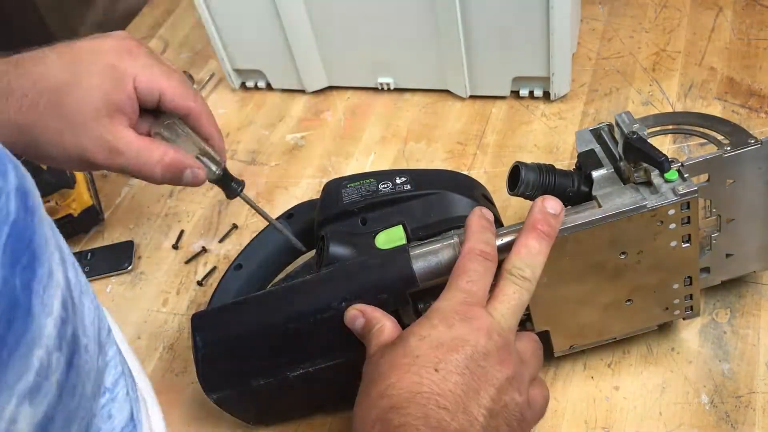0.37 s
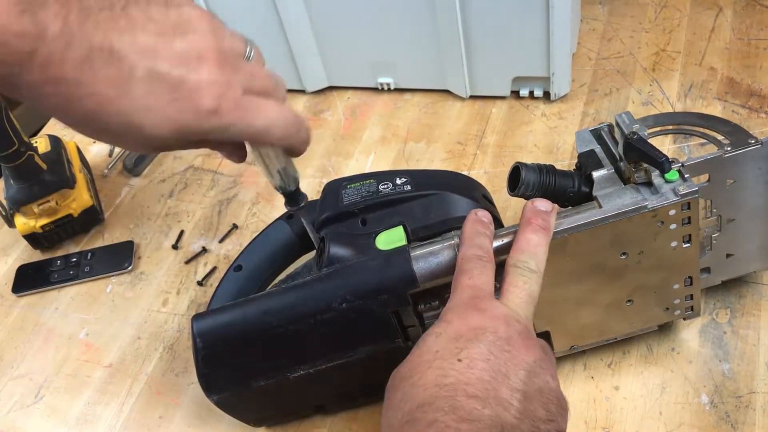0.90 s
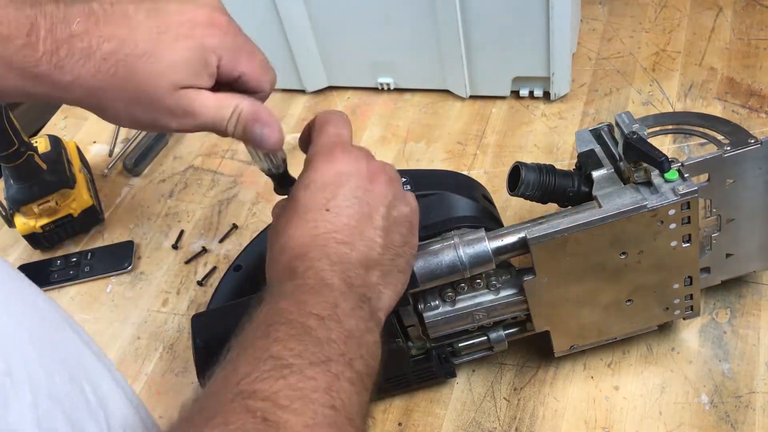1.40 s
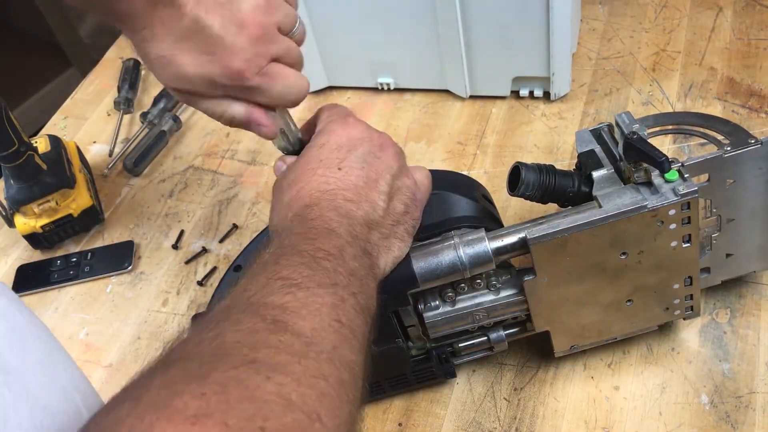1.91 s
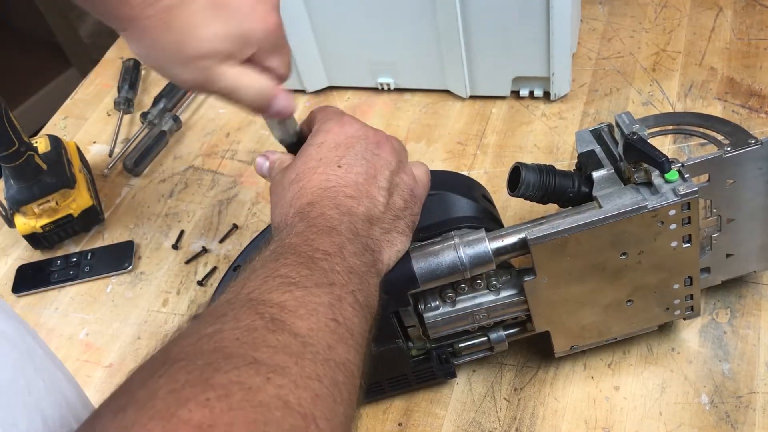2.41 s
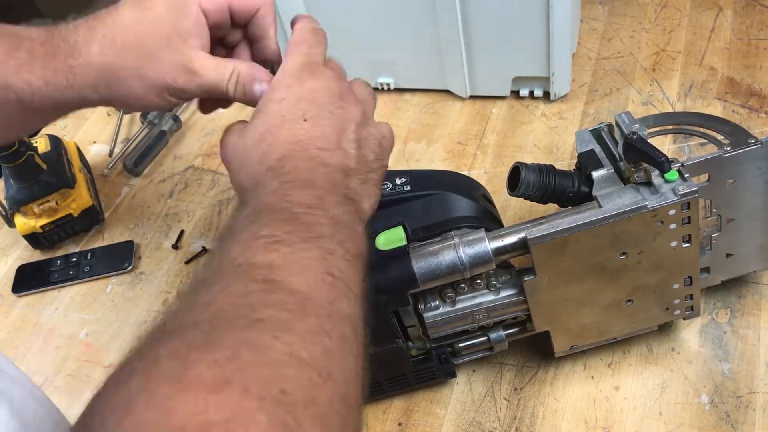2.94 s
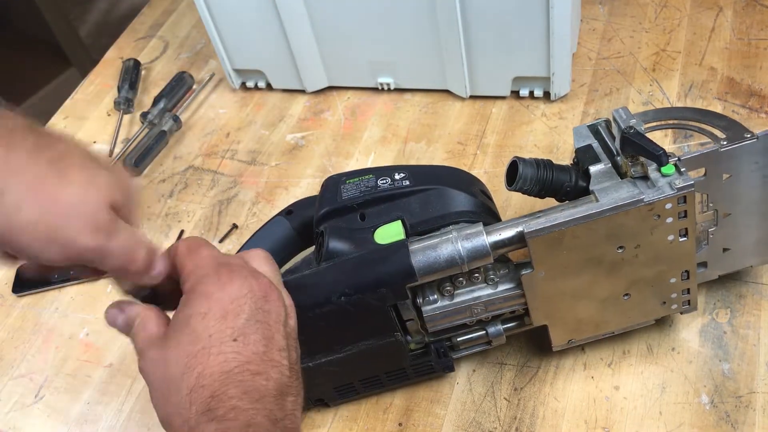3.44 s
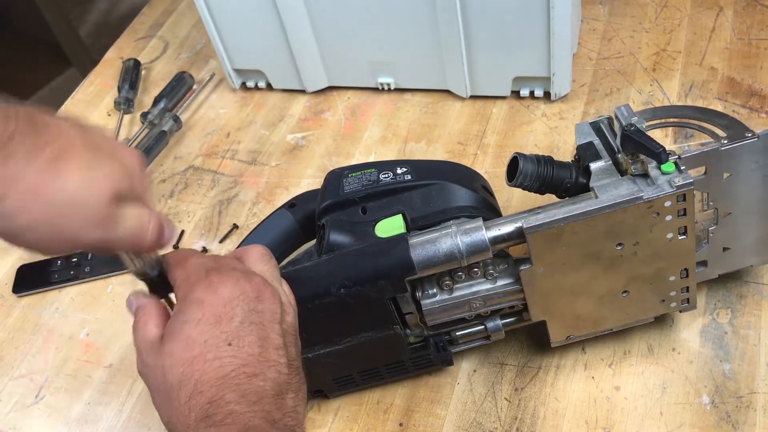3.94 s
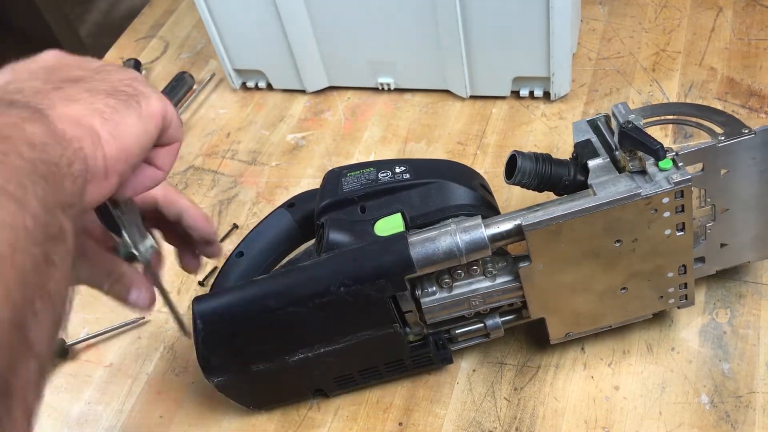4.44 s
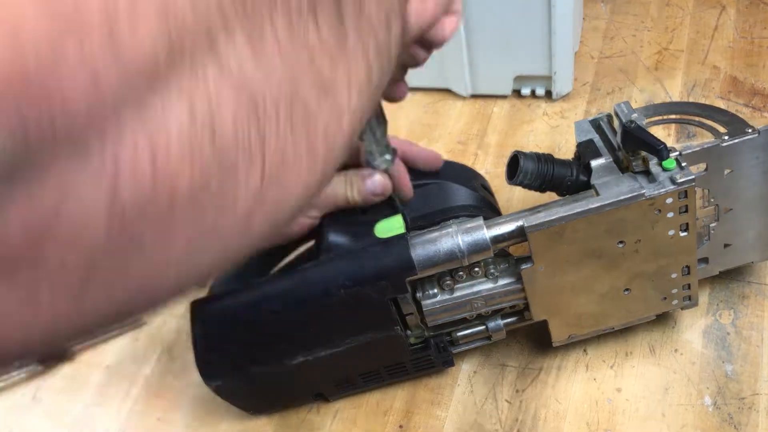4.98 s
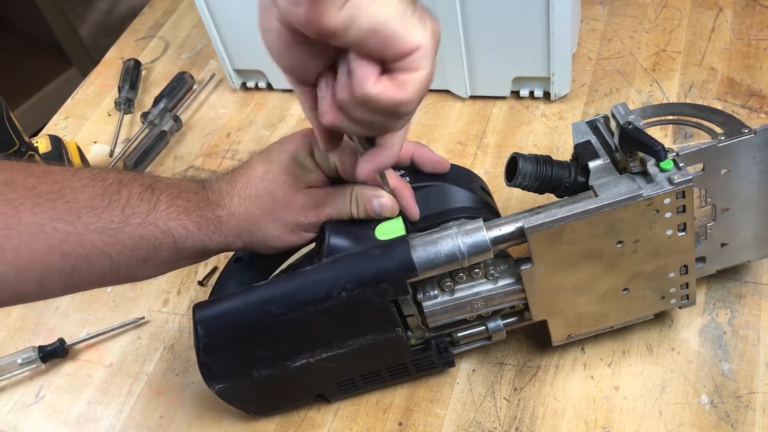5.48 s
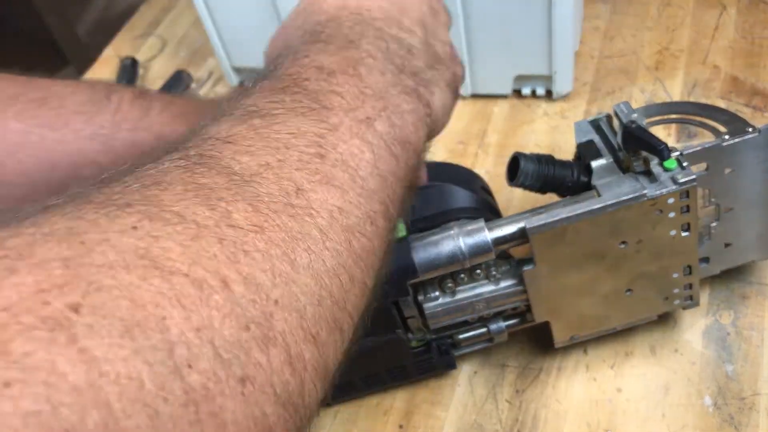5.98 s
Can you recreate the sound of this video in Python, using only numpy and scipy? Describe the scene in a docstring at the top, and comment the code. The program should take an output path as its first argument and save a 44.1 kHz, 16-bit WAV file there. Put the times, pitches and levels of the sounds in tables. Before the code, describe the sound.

Hand tool work on a wooden bench in a quiet indoor workshop, heard from very near. Crisp, dry, uneven steel ticks with tiny hollow plastic knocks crowd the first second, thin out while a screw is turned, then return as louder snaps and rattly handling. Soft finger rubs and fine gritty scrapes fill the gaps. Behind them are faint steady machine tones and, near the start, a brief low drone.

```python
"""A steel screwdriver works small screws out of a hollow plastic tool housing on a wooden bench, close by.
Each contact is an impulsive crack that excites the modes of shaft and housing, with a short noise tail.
Between the ticks, filtered noise with uneven slips and grit forms the rubbing and soft handling sounds.
Behind lies a quiet workshop of coloured noise and sine tones, with a low drone passing near the start."""
import sys
import numpy as np
from scipy import signal
from scipy.fft import rfft, irfft, next_fast_len
from scipy.io import wavfile
from scipy.ndimage import uniform_filter1d, minimum_filter1d, map_coordinates

SR = 44100
rng = np.random.default_rng(int(sys.argv[2]) if len(sys.argv) > 2 else 0)


def unload_audio(sound):
    """Save the sound as a 16-bit wav file, at the path given as the first command line argument."""
    columns = np.transpose(np.atleast_2d(sound))
    # keep every value between -1 and 1, then stretch to whole-number steps
    steps = np.round(np.clip(columns, -1, 1) * 32767)
    wavfile.write(sys.argv[1], SR, steps.astype(np.int16))


def to_linear_factor(level_db):
    """Convert decibel levels (scalar or array-like) to linear amplitude factors."""
    exponent = np.asarray(level_db, float) / 20
    return 10 ** exponent


N = 269274

# Tip on steel: (time [s], relative shaft ring level [dB], grip: housing body over shaft [dB],
# lean: lower over upper shaft ring [dB], sharpness: edge over shaft [dB])
STEEL_TICKS = [(0.0412, -40, 0, -3, -5), (0.048, -38, -4, 0, -7), (0.055, -36.5, -29, -21, -21),
               (0.0621, -23.5, -17, -15, -27), (0.0698, -29, -25, 2, 6), (0.0844, -49, -12, 5, -10),
               (0.1006, -31, -13, -18, -2), (0.1056, -34, -31, -16, -13), (0.1177, -31, -6, 0, 6),
               (0.124, -39, 4, 14, 13), (0.1561, -32, 11.5, 4, -9), (0.2856, -40.5, -7, 16, 8),
               (0.2915, -36, -16, 9, 8), (0.298, -42, -15, 18, -18), (0.3077, -36.5, -8, 16, 3),
               (0.318, -44, -8, 13, -10), (0.3271, -38.5, -28, 19, 10), (0.47, -38.5, -13, 9, 3),
               (0.477, -38, -15, 23, 2), (0.4855, -36, -3, 11, 15), (0.493, -27, -18, -20, -7),
               (0.5082, -35, -22, -5, 0), (0.547, -33, -5, 0, 7), (0.5538, -23, -9, -9, -12),
               (0.6286, -32.5, -11, 2, 1), (0.646, -48, -12, 3, -20), (0.6542, -34, -30, -9, 4),
               (0.74, -38, -24, 0, 3), (0.7896, -37.5, -25, -14, 2), (0.84, -45, -4, 5, -11),
               (0.847, -39.5, -28, -11, -36), (0.8814, -44, -19, 0, -12), (0.8867, -35.5, 3.5, 2, -8),
               (0.899, -38, -26, -8, 6), (0.9157, -40, -23, -3, 6), (0.9218, -42, -26, -19, -22),
               (0.929, -31, -21, -1, 0), (0.9716, -33.5, -21, 1, 7), (0.978, -32.5, -31, 1, -9),
               (0.984, -30.5, -15, -15, -32), (1.005, -33, -18, -8, -27), (1.042, -27.5, -1.5, -12, 2),
               (1.049, -39, -22, -4, -13), (1.052, -42, -3, 3, -8), (1.059, -31.5, 5.5, -8, -24),
               (1.064, -44, -15, -2, 4), (1.106, -43, -3, 0, -1), (1.1108, -46, -18, -9, -16),
               (1.1152, -39, -8, -20, -41), (1.198, -51.5, -26, -18, -20), (1.474, -39.5, -8, 4, -8),
               (1.4855, -39, -20, 9, -26), (1.4986, -39, -5, 12, 4), (1.55, -37.5, -6, -4, -2),
               (1.5718, -38, -5, 7, -15), (1.583, -30, -6, 11, -30), (1.6017, -33, -12, 15, -6),
               (1.624, -43, -21, 16, -2), (1.634, -43.5, -7, 4, 16), (1.6958, -44, -22, 13, 9),
               (1.7075, -40, -21, 4, -9), (1.7163, -19, -7, -3, -1.5), (1.7715, -34.5, 0.5, -5, -23),
               (1.8667, -42, -12, -8, -3), (1.8778, -22, 3, -3, 6), (1.961, -42, -19, -13, 3),
               (2.007, -40, 3.5, 10, -4), (2.126, -46, -15, -5, -7), (2.137, -36, -18, -11, -5),
               (2.144, -38, -30, 8, -8), (2.194, -33, -7, -3, -7), (2.247, -38.5, -4, 11, -14),
               (2.298, -34.5, -12, -5, -6), (2.3873, -40.5, -8, 1, -11), (2.3957, -34, -12, -12, -6),
               (2.446, -38, -13, -2, -5), (2.597, -43.5, -17, 12, -12), (2.8462, -38, -1, 1, -16),
               (2.929, -36.5, -10, -13, -32), (2.9413, -36, 3, 10, -4), (2.9497, -32, 4.5, 9, 1),
               (2.965, -40, -28, -12, -26), (2.99, -35, 6.5, 12, 2), (3.005, -36.5, -22, -2, -30),
               (3.043, -25, -17, -13, -42), (3.0538, -35, 7, 18, -4), (3.0848, -32.5, -11, 6, -11),
               (3.1393, -36, 5, -17, -1), (3.161, -37, 2, -5, -12), (3.178, -15.5, 1, 0, -3),
               (3.1914, -19, -2, -15, -11), (3.236, -48, -13, -20, -16), (3.2458, -46.5, 4, -12, 1),
               (3.366, -44, 2, -4, -10), (3.3799, -16.5, -2.5, -0.5, -12), (3.478, -54, 14, -4, -7),
               (3.4835, -41.5, 0, -11, -15), (3.7799, -30, 5.5, 2, -8), (3.785, -35.5, 4, 2, -7),
               (3.8354, -18.5, -2.5, 2.5, 3), (3.896, -30.5, 13.5, 7, -4), (3.9028, -22, -1, -9, 4.5),
               (3.9342, -42, 6, -5, -18), (3.959, -52, 1, -15, 12), (4.045, -38.5, 8.5, -4, -8),
               (4.0716, -17.5, -2, 3, -12), (4.0776, -27, 4.5, -22, 7.5), (4.1036, -40, 4, 5, -18),
               (4.191, -40, 3, -9, 1), (4.2237, -45.5, -12, -20, 15.5), (4.238, -58, 18, -2, 27),
               (4.25, -54, 1, -6, 17), (4.279, -47, 7, 2, 17), (4.3042, -50, 4, -3, 17),
               (4.3105, -23.5, 5, -13, 0.5), (4.336, -28.5, 7.5, -2, 0), (4.374, -26.5, 5, -16, -6),
               (4.3865, -26.5, 3, 3, -25), (4.441, -42.5, 8, -10, 14), (4.4564, -40, 7, -7, 6),
               (4.4669, -45, 12, -11, 17), (4.473, -50, 5, -8, 18), (4.4806, -40, 14.5, -2, 8),
               (4.4995, -43.5, 13, -4, 10), (4.585, -46, 5, 2, 16), (4.5936, -41, 3, -1, 16),
               (4.602, -22.5, -2.5, 4, 1), (4.695, -43.5, -3, -2, 10), (4.7106, -28, 1, -22, 2),
               (4.72, -42, -4, -6, 13), (4.729, -39, -20, 2, 4), (4.7376, -33.5, 4, -14, 9.5),
               (4.7574, -27.5, -6.5, -2, -5), (4.784, -35, 3, -6, -2), (4.794, -34.5, 4.5, 5, -5),
               (4.822, -48.5, 10, -9, 14), (4.8376, -47, -9, -16, 6), (4.8476, -41.5, 7.5, -3, 7),
               (4.868, -56, -13, -16, 14), (4.883, -47.5, -6, -27, 8), (4.973, -32.5, -2, -10, 12.5),
               (4.9865, -52, -13, -3, 17), (4.997, -23.5, -16, 5, -3), (5.014, -31.5, -13, 3, -10),
               (5.059, -39, -27, -12, -8), (5.175, -41.5, -17, -6, -16), (5.1901, -42.5, 4, 2, -4),
               (5.198, -56, -9, 6, 14), (5.208, -34, -8, -1, -18), (5.2367, -33, -10, -3, -17),
               (5.274, -37, -11, 2, -4), (5.354, -38, 0.5, -4, -7), (5.428, -44, -18, 10, 0),
               (5.4586, -45, -18, -11, -9), (5.509, -47, -22, 16, 0), (5.5512, -42.5, -2, 4, -2),
               (5.575, -37.5, -4, 4, -12), (5.6384, -39, -20, -17, 7), (5.6584, -28.5, -44, 8, 5.5),
               (5.741, -53.5, -13, -10, 13), (6.0025, -41, 3, -3, 13), (6.0108, -36, -7, 0, 10),
               (6.0254, -29, -24, 6, -15), (6.0699, -23.5, -13.5, 2, -6), (6.0855, -34, -8, 1, 2),
               (6.1041, -31, -11, -3, -12)]
# Light touches of the tip, colour left to chance: (time [s], relative shaft ring level [dB])
LIGHT_TOUCHES = [(0.0647, -35.5), (0.099, -44), (.4795, -39), (.533, -45), (.614, -50), (.691, -47),
                 (0.699, -50), (.707, -45), (.808, -47), (0.858, -58), (.871, -52), (1.281, -46),
                 (1.856, -63), (1.927, -46), (1.947, -46), (1.9924, -44), (2.181, -58), (2.2248, -54),
                 (2.33, -51), (2.3495, -46), (2.379, -56), (2.44, -46), (2.488, -43), (2.554, -47.5),
                 (2.7013, -43.5), (2.817, -47.5), (3.3761, -34), (4.735, -32), (4.852, -41), (5.074, -53),
                 (5.16, -51), (5.231, -46), (5.249, -45), (5.268, -42), (5.3176, -47.5), (5.334, -42.5),
                 (5.378, -51), (5.398, -51), (5.417, -55), (5.479, -50), (5.5426, -46), (5.567, -47),
                 (5.612, -53), (5.619, -51), (5.709, -50.5), (5.8225, -48)]
# Dull blows that reach the hollow housing: (time [s], relative level [dB])
HOUSING_KNOCKS = [(0.0151, -54), (0.0535, -46.5), (0.1551, -37.5), (0.5583, -54), (0.6458, -47),
                  (0.7447, -52.5), (0.8599, -52.5), (0.8734, -51.5), (0.8896, -50.5), (0.9235, -52.5),
                  (0.9789, -50.5), (1.0029, -53), (1.0432, -39), (1.0687, -43.5), (1.1151, -58.5),
                  (1.198, -60), (1.5836, -52), (1.5998, -50.5), (1.8798, -47.5), (1.9616, -49),
                  (2.1439, -50.5), (2.1954, -51), (2.9545, -52.5), (3.0448, -51.5), (3.2374, -57),
                  (3.3798, -36), (3.7864, -47), (3.8988, -38.5), (3.9833, -47), (4.0795, -48.5),
                  (4.388, -56), (4.4658, -55), (4.4862, -53), (4.5004, -60), (4.6032, -53), (4.7096, -50.5),
                  (4.7388, -48.5), (4.76, -58), (4.792, -48), (4.8527, -48), (4.884, -68), (4.9954, -51.5),
                  (5.0125, -61), (5.2101, -52), (5.2756, -54.5), (5.5764, -55), (5.6595, -50.5),
                  (6.0229, -48), (6.0693, -48.5)]
# Blows that shift the tool on the bench: (time [s], relative level [dB])
BENCH_JOLTS = [(0.1577, -40), (1.879, -44), (3.382, -44), (3.9, -45), (4.072, -49), (1.717, -53)]
# Modes that a contact rings: (frequency [Hz], width [Hz], relative level [dB])
CONTACT_MODES = [(585, 150, 11.5), (761.6, 29, 31.5), (930, 63.5, 27), (1100, 16, 11.5), (1231, 51, 19.5),
                 (1790, 330, 7), (2325, 370, 7.5), (2774, 324, 4), (3557, 370, 4.5), (4370, 185, 0.5),
                 (5510, 354, 6.5), (6386, 350, -0.5), (7640, 590, 3), (8846, 216, -1.5), (10690, 480, -5),
                 (11790, 670, -4.5), (13000, 340, -4), (14230, 580, -3.5)]
# Short noise tail of a contact: (frequency [Hz], 60 dB decay time [s])
TAIL_DECAY = [(500, 0.062), (1300, 0.078), (3500, 0.034), (9000, 0.033), (16000, 0.041)]
# Rubbing: (time [s], relative fine scrape level [dB], treble above about 9.5 kHz over it [dB])
RUB_LEVELS = [(0.0, -58, -2), (0.27, -77, 0), (0.39, -68, -12), (0.53, -63.5, -2), (0.66, -59.5, -4),
              (0.94, -63.5, -4), (1.26, -61.5, -2.5), (1.53, -66.5, -4), (1.7, -61, 1), (1.99, -64, -2.5),
              (2.48, -63, -3), (2.67, -64.5, -9), (2.91, -64.5, -9), (3.08, -62.5, -2), (3.49, -64, -8),
              (3.67, -62, -6), (4.34, -63, -2), (4.61, -66, 0), (5.44, -61, -5), (5.53, -66.5, -2),
              (5.75, -65.5, -2), (6.11, -70, 9)]
# Soft swishes and faint rattling of handling: (middle time [s], length [s], level [dB])
HANDLING_SWISHES = [(0.05, 0.46, -53), (1.055, 0.21, -68), (1.57, 0.24, -59), (2.628, 0.15, -58),
                    (3.35, 0.11, -56), (3.49, 0.16, -59.5), (3.614, 0.31, -62), (4.27, 0.074, -60),
                    (4.466, 0.13, -62), (4.778, 0.52, -62), (4.975, 0.23, -60), (5.955, 0.67, -63)]
# Colour of the tip's scrape: (frequency [Hz], relative level [dB])
SCRAPE_SPECTRUM = [(2500, -28), (4500, 1), (5500, -1.5), (8000, -1.5), (10000, -1.5), (15800, 2.5),
                   (16100, -55)]
# Colour of the fingers' rub and the handling: (frequency [Hz], relative level [dB])
HANDLING_SPECTRUM = [(1500, -27), (2600, -6.5), (3200, 0.5), (3700, -2), (5000, -12.5)]
# Colour of the room air: (frequency [Hz], relative level [dB])
AIR_SPECTRUM = [(20, -22), (200, -22.5), (300, -13.5), (450, -4.5), (600, -9), (800, 5), (1000, -1.5),
                (1500, -1.5), (2100, -2.5), (3000, -11.5), (5000, -24), (9000, -26.5), (15800, -35),
                (16100, -82)]
# Colour of the low noise around the drone: (frequency [Hz], relative level [dB])
RUMBLE_SPECTRUM = [(60, -26), (250, -12), (400, 5), (520, -37)]
# Nearly steady machine lines: (mean frequency [Hz], mean level [dB])
MACHINE_LINES = [(484, -77), (968, -72), (1936, -73.5), (568, -66.5), (594, -72.5)]
# Path of the drone's lower tone: (time [s], mean frequency [Hz], mean level [dB])
DRONE_PATH = [(.29, 480, -82), (.33, 443, -70), (.38, 409, -88), (.5, 300, -90), (.58, 314, -75),
              (.66, 320, -72), (.8, 328, -72), (.98, 332, -71), (1.04, 346, -72), (1.1, 356, -88)]

REGISTER_HZ = [1000, 3600, 5500, 7600, 13500]  # hollow, body, lower shaft, upper shaft, edge
SPAN = 6144  # samples given to one contact
DETUNE, VARY_DB = .3, 2.2  # mode shift as a share of its width; scatter of its strength
TAIL_DB = -7  # noise tail relative to the direct tick
TICK_HOLLOW_DB, TICK_GRIP_SHARE = -32.5, 0.024  # a tick's hollow knock over its shaft ring; share of grip added
KNOCK_BODY_DB, KNOCK_TOP_DB = 7.5, -51  # a knock's body and treble relative to its level
FAINT_PER_S = 30  # chance ticks, on average over the whole scene
# Chance ticks: shaft ring over the scrape table, scatter, body and edge over the shaft
FAINT_DB, FAINT_SPREAD_DB, FAINT_TINT_DB = 7, 4.5, -3.5
BUSY_S = .05  # window, applied twice, that spreads each tick into a time of hard dragging
BUSY_DB, GRIT_REST = 1.5, 0.71  # scrape gain over the pauses; amplitude of grit left in them
SLIPS_PER_S, SLIP_DB = 70, 3.5  # rate and depth of the scrape's unevenness
GRIT_PER_S, GRIT_DB = 350, 1  # mean click rate; grit level before the busy weighting
FINGERS_REST_DB = -5.5  # resting fingers, relative to the scrape table
CEILING, HOLD = .46, 130  # limiter threshold (amplitude); its smoothing window (samples, about 3 ms)
TOP_HZ, EDGE_HZ = 16400, 700  # middle and width of the band limit


def unit(x):
    """Normalization: x at rms 1."""
    return x / np.sqrt(np.mean(x ** 2) + 1e-20)


def along(points, hz):
    """Interpolation on a logarithmic frequency axis through (frequency [Hz], value) points."""
    f, v = np.transpose(points)
    return np.interp(np.log(hz + 1), np.log(f + 1), v)


def curves(rows, **ends):
    """Linear interpolation in time: one value per sample for each column after the time."""
    s, *columns = np.transpose(rows)
    return [np.interp(np.arange(N) / SR, s, c, **ends) for c in columns]


def wobble(rate):
    """Band-limited random modulation: a smooth curve through `rate` random knots a second."""
    knots = rng.standard_normal(int(N * rate / SR) + 4)
    return map_coordinates(knots, [np.arange(N) * rate / SR])


def coloured(x, spectrum):
    """Linear filtering: x shaped by a spectrum table, then set to rms 1."""
    m = next_fast_len(N + 8192)
    gain = to_linear_factor(along(spectrum, np.fft.rfftfreq(m, 1 / SR)))
    return unit(irfft(rfft(x, m) * gain, m)[:N])


def bell(middle_s, length_s):
    """Gaussian envelope: a rise and fall centred on middle_s, with e^-2 points length_s apart."""
    return np.exp(-8 * ((np.arange(N) / SR - middle_s) / length_s) ** 2)


def tone(hz, db):
    """Frequency modulation: a sine whose phase is the running sum of hz, with rms level db."""
    return np.sqrt(2) * to_linear_factor(db) * np.sin(2 * np.pi * np.cumsum(hz) / SR)


def workshop():
    """Superposition of broadband room air, narrow machine lines and a gliding two-partial drone."""
    drift_db = .8 * wobble(3) + 1.2 * wobble(13)
    air = to_linear_factor(-61 + drift_db) * coloured(rng.standard_normal(N), AIR_SPECTRUM)
    hum = sum(tone(hz * (1 + .0012 * wobble(6)), db + .9 * wobble(12)) for hz, db in MACHINE_LINES)
    drone_hz = curves(DRONE_PATH)[0]
    drone_db = curves(DRONE_PATH, left=-120, right=-120)[1]
    drone_hz = drone_hz + 3 * wobble(25)
    drone_db = drone_db + 2.2 * wobble(30)
    swell = to_linear_factor(-70) * bell(middle_s=0.84, length_s=1.08)
    rumble = swell * coloured(rng.standard_normal(N), RUMBLE_SPECTRUM)
    drone = tone(drone_hz, drone_db) + tone(2 * drone_hz, drone_db - 6)
    return air + rumble + hum + drone


def modes(hz, shift=0):
    """Resonance of a damped oscillator, one row a mode; shift moves it by a share of its width."""
    centre, width = np.transpose(CONTACT_MODES)[:2, :, None]
    return 1j * hz * width / ((centre + shift * width) ** 2 - hz ** 2 + 1j * hz * width)


def busy():
    """Saturating event density: 0 in pauses, towards 1 where ticks crowd and the tip drags hard."""
    tick_samples = np.round(np.transpose(STEEL_TICKS)[0] * SR).astype(int)
    marks = 1. * np.bincount(tick_samples, minlength=N)
    reach = round(BUSY_S * SR)
    return np.tanh(reach * uniform_filter1d(uniform_filter1d(marks, size=reach), size=reach))


def swishes():
    """Amplitude modulation: each soft swish or faint rattle of handling swells and fades as a bell curve."""
    return sum(to_linear_factor(db) * bell(s, length) for s, length, db in HANDLING_SWISHES)


def slips(rate, depth_db):
    """Uneven friction: white noise whose level wanders at random."""
    return to_linear_factor(depth_db * wobble(rate)) * rng.standard_normal(N)


def grit_clicks():
    """Random impulsive excitation of resonances: tiny noisy clicks ring the contact modes."""
    chance, size = rng.random((2, N))
    clicks = (chance < GRIT_PER_S / SR) * size ** -.3
    bursts = signal.lfilter([1], [1, -.95], clicks) * rng.standard_normal(N)
    hz = np.fft.rfftfreq(N, 1 / SR)
    power = to_linear_factor(2 * np.transpose(CONTACT_MODES)[2]) @ abs(modes(hz)) ** 2
    return irfft(rfft(bursts) * np.sqrt(power), N)


def rubbing():
    """Friction noise: tip and fingers drag as hiss broken into uneven slips, with ringing grit."""
    scrape_db, bright_db = curves(RUB_LEVELS)
    grit = grit_clicks()
    scrape = coloured(slips(SLIPS_PER_S, SLIP_DB), SCRAPE_SPECTRUM)
    scrape = scrape + to_linear_factor(GRIT_DB) * (GRIT_REST + busy()) * coloured(grit, SCRAPE_SPECTRUM)
    hz = np.fft.rfftfreq(N, 1 / SR)
    treble = irfft(rfft(scrape) * np.clip(hz / 3000 - 2.7, 0, 1), N)  # crossover from 8.1 to 11.1 kHz
    drag = to_linear_factor(scrape_db + BUSY_DB * (busy() - 2.0))
    scrape = drag * (scrape - treble + to_linear_factor(bright_db) * treble)
    handling_gain = to_linear_factor(scrape_db + FINGERS_REST_DB) + swishes()
    return scrape + handling_gain * coloured(slips(60, depth_db=3.5), HANDLING_SPECTRUM)


def noise_tails(count):
    """Exponential decay: a short decaying noise tail, drawn at random for each contact."""
    hz, t, z = signal.stft(rng.standard_normal((count, SPAN // 2)), SR, nperseg=128)
    decay = to_linear_factor(-60 * t / along(TAIL_DECAY, hz)[:, None])
    tail = signal.istft(z * decay, SR, nperseg=128)[1]
    tail = np.pad(tail, [(0, 0), (50, 0)])  # 50 samples behind the direct sound
    return rfft(tail / np.linalg.norm(tail, axis=1)[:, None], SPAN)


def contacts():
    """Impact excitation: times, strengths in the five registers and bench jolts of all contacts."""
    s, shaft, grip, lean, sharp = np.transpose(STEEL_TICKS)
    light_s, light_db = np.transpose(LIGHT_TOUCHES)
    chance = rng.standard_normal(round(FAINT_PER_S * N / SR))
    draw = rng.standard_normal((len(chance) + len(LIGHT_TOUCHES), 4))

    # faint chance ticks gather near the listed ticks
    faint_s = rng.choice(s, len(chance)) + BUSY_S * rng.normal(0, .5, len(chance))
    faint_s = np.clip(faint_s, .002, (N - 1) / SR)
    scrape_db = np.interp(faint_s, *np.transpose(RUB_LEVELS)[:2])
    faint_db = scrape_db + FAINT_DB + FAINT_SPREAD_DB * chance
    s = np.r_[s, faint_s, light_s]
    shaft = np.r_[shaft, faint_db, light_db]
    grip = np.r_[grip, FAINT_TINT_DB + FAINT_SPREAD_DB * draw[:, 1]]
    sharp = np.r_[sharp, FAINT_TINT_DB + FAINT_SPREAD_DB * draw[:, 2]]
    lean = np.r_[lean, FAINT_SPREAD_DB * draw[:, 3]]

    knock_s, blow = np.transpose(HOUSING_KNOCKS)
    knock_top = blow + KNOCK_TOP_DB
    hollow = np.r_[shaft + TICK_HOLLOW_DB + TICK_GRIP_SHARE * grip, blow]
    body = np.r_[shaft + grip, blow + KNOCK_BODY_DB]
    lower = np.r_[shaft + lean / 2, knock_top]
    upper = np.r_[shaft - lean / 2, knock_top]
    edge = np.r_[shaft + sharp, knock_top]

    # a jolt has only its thump, every other contact has none
    shift_s, jolt_db = np.transpose(BENCH_JOLTS)
    no_ring = np.full(len(shift_s), -200)
    registers = [np.r_[r, no_ring] for r in (hollow, body, lower, upper, edge)]
    return np.r_[s, knock_s, shift_s], registers, np.r_[np.full(len(hollow), -200), jolt_db]


def strengths_at(hz, register_db):
    """Spectral interpolation: the level of each contact, one row a contact, between its registers."""
    knots = np.log(REGISTER_HZ)
    return np.array([np.interp(np.log(hz + 1), knots, row) for row in zip(*register_db)])


def ticks():
    """Modal synthesis: a crack of a few milliseconds with ringing modes, at new strengths each time."""
    s, register_db, jolt_db = contacts()
    t, hz = np.arange(400) / SR, np.fft.rfftfreq(SPAN, 1 / SR)
    centre, _, mode_db = np.transpose(CONTACT_MODES)
    count = len(centre)
    draw = rng.standard_normal((len(s), 512))

    envelope = (t / .00025) ** 2 * np.exp(-t / 0.00041)  # builds, then lets go
    chatter = rfft(draw[:, :len(t)] * envelope, SPAN)
    chatter /= np.sqrt(uniform_filter1d(abs(chatter) ** 2, size=150, axis=1) + 1e-9)  # even over frequency
    # radiated straight from the contact
    crack = to_linear_factor(strengths_at(hz, register_db) - 4) * chatter * hz / (hz + 1500)

    strength = to_linear_factor(mode_db + strengths_at(centre, register_db) + VARY_DB * draw[:, -count:])
    strength = strength * (-1) ** np.arange(count)  # alternate signs keep the valleys filled
    # slow bending waves: the housing's low modes answer a few ms after the crack
    lag = 0.000212 + 2.254 / centre[:, None]
    late = np.exp(-2j * np.pi * hz * lag)
    side = np.sign(draw[:, len(t) + count:len(t) + 2 * count])  # each mode is shifted up or down at random
    rings = sum((strength * (side == way)) @ (modes(hz, way * DETUNE) * late) for way in (-1, 1))

    small_body = hz ** 2 / (hz ** 2 + 450 ** 2)  # a small body radiates little bass
    thump = to_linear_factor(jolt_db)[:, None] / (1 + 1j * hz / 160)  # a hard blow also jolts the bench
    direct = small_body * (rings + crack) + thump
    rung = to_linear_factor(20.0) * irfft(direct * (1 + to_linear_factor(TAIL_DB) * noise_tails(count=len(s))), SPAN)

    # the last 64 samples of the circular response belong ahead of the contact
    offset = (np.arange(SPAN) + 64) % SPAN - 64
    where = np.round(s * SR).astype(int)[:, None] + offset
    return np.bincount(where.ravel(), rung.ravel(), N + SPAN)[:N]


def scene():
    """Superposition: contacts and rubbing up close, the workshop behind."""
    return (ticks() + rubbing() + workshop())[None]


def limited(x):
    """Dynamic range limiting: the gain dips smoothly around the highest peaks."""
    gain = minimum_filter1d(np.minimum(1, CEILING / (abs(x) + 1e-9)), size=2 * HOLD)
    return x * uniform_filter1d(uniform_filter1d(gain, size=HOLD), size=HOLD)


def top_cut(x):
    """Nothing passes above the cut-off."""
    return signal.sosfilt(signal.butter(12, 17000, fs=SR, output="sos"), x)


def record(dry):
    """Peak limiting and low-pass filtering: a limiter lowers the highest peaks, then the treble is cut off."""
    slope = np.clip((TOP_HZ - np.fft.rfftfreq(N, 1 / SR)) / EDGE_HZ + .5, 0, 1)
    mix = irfft(rfft(limited(dry)) * np.sin(np.pi / 2 * slope) ** 2, N)
    return top_cut(mix)


dry = scene()
out = record(dry)
unload_audio(out)
```